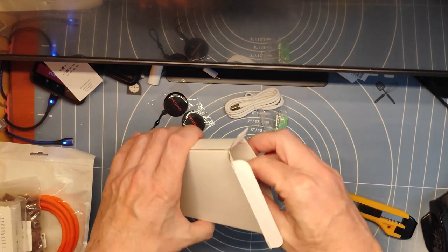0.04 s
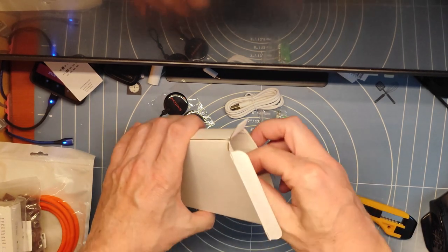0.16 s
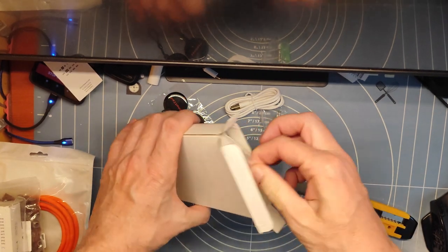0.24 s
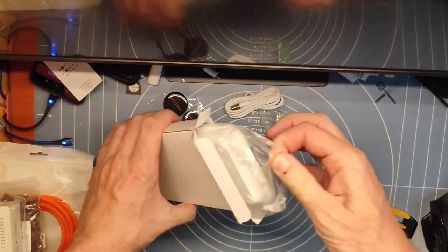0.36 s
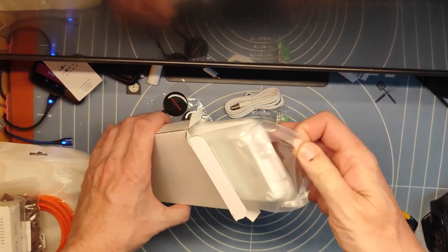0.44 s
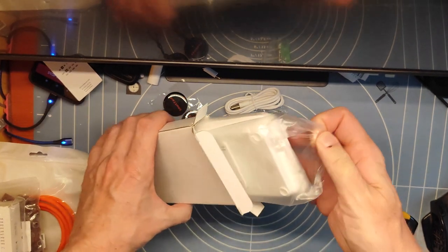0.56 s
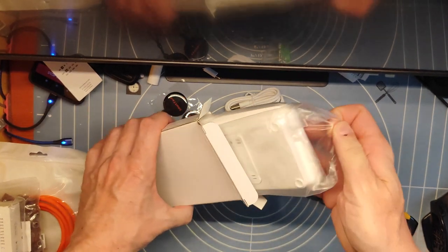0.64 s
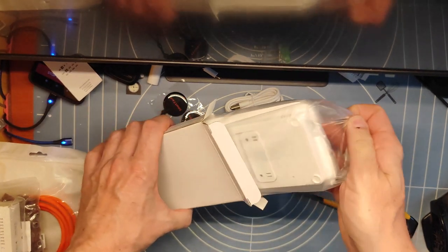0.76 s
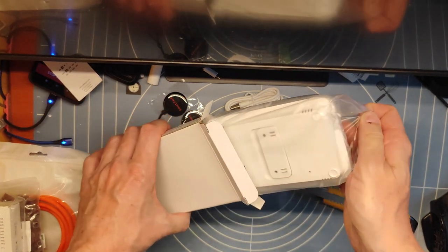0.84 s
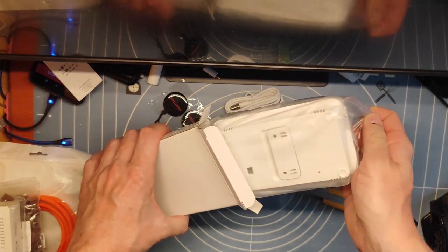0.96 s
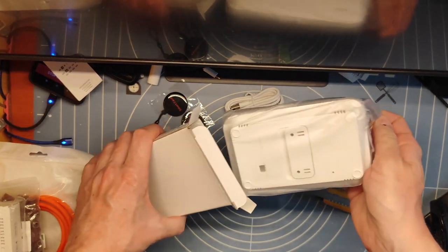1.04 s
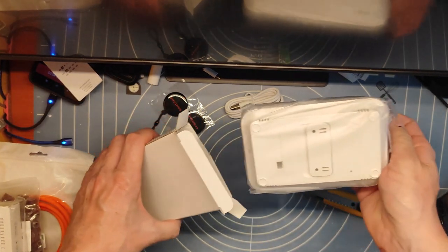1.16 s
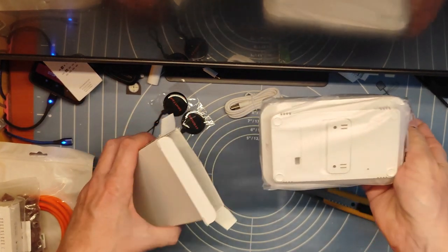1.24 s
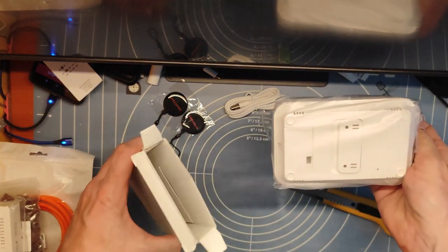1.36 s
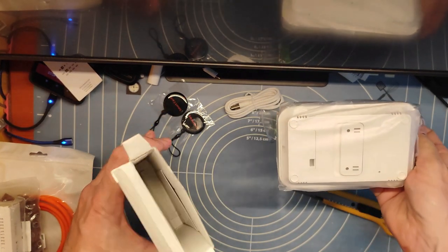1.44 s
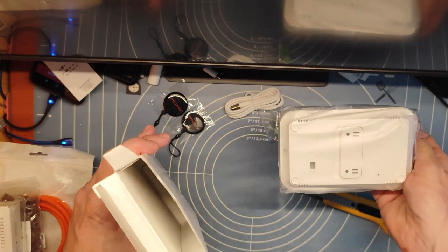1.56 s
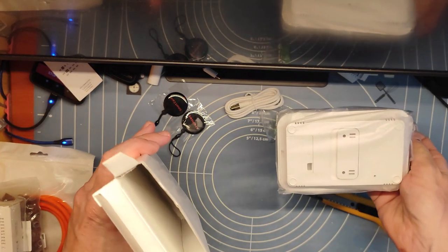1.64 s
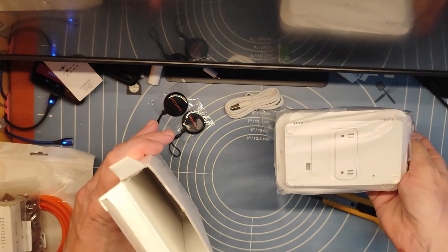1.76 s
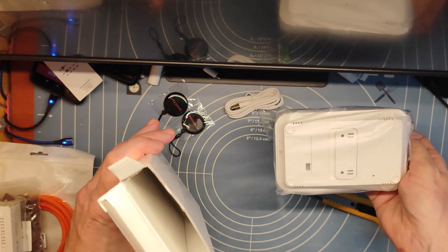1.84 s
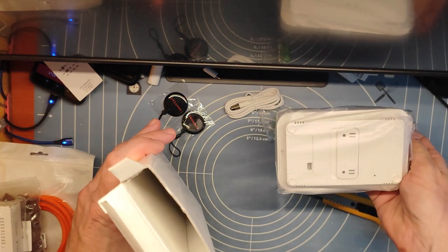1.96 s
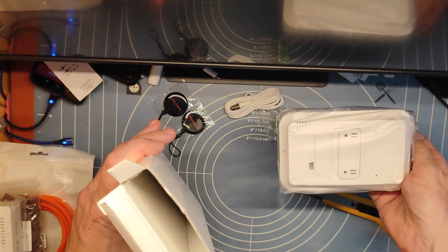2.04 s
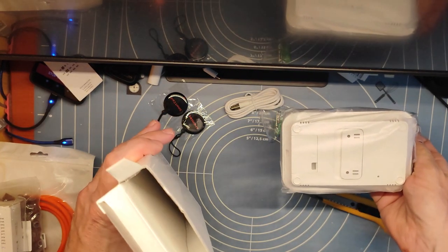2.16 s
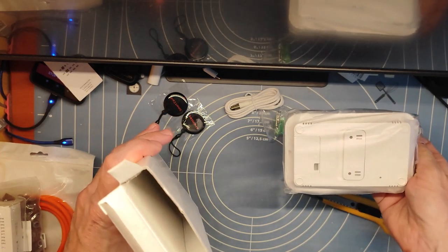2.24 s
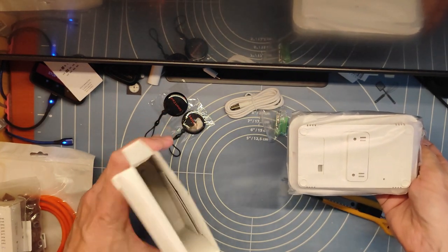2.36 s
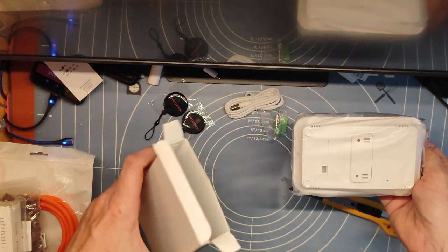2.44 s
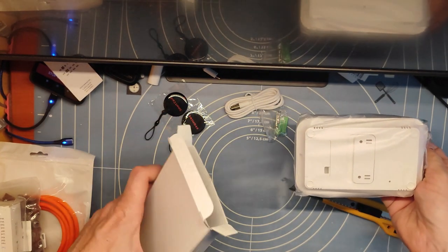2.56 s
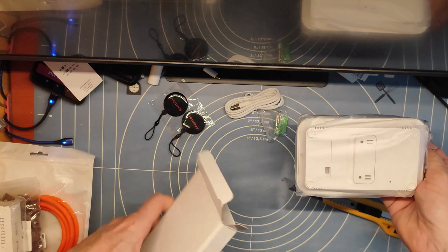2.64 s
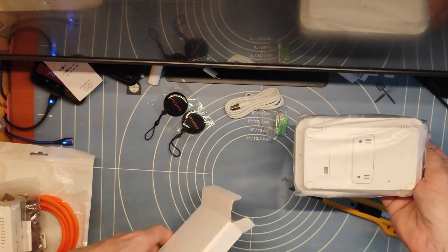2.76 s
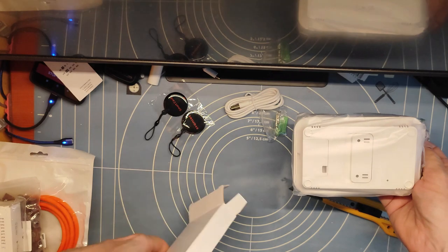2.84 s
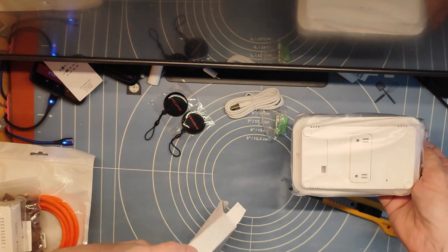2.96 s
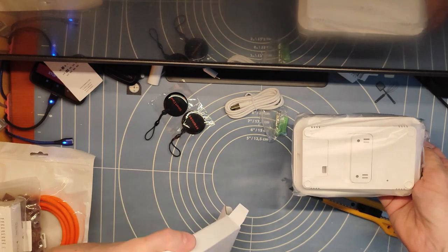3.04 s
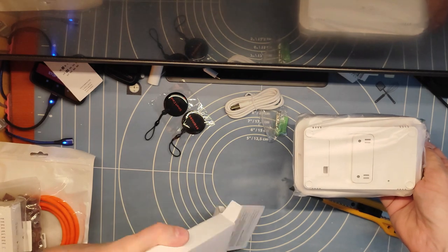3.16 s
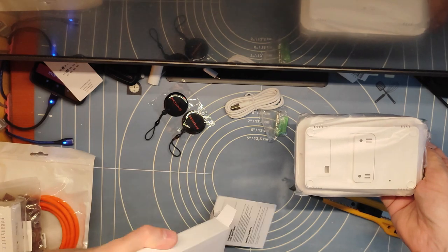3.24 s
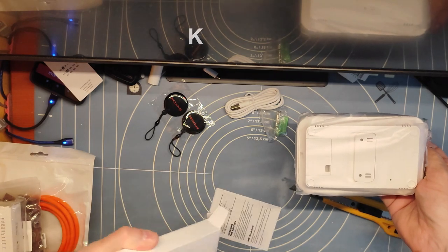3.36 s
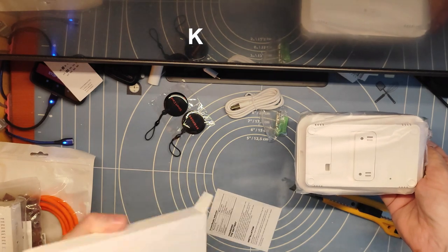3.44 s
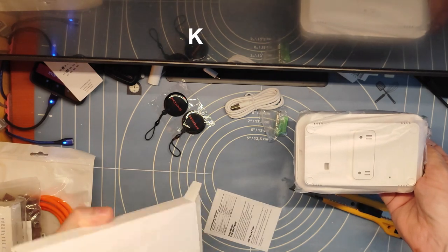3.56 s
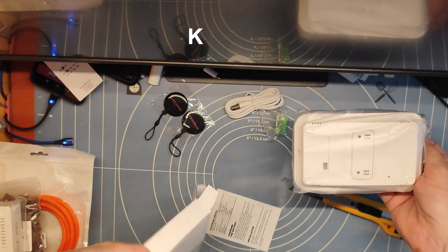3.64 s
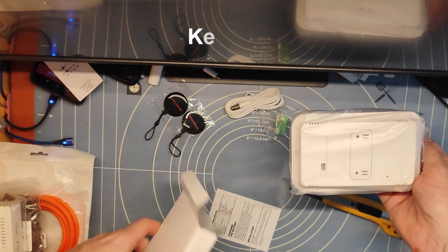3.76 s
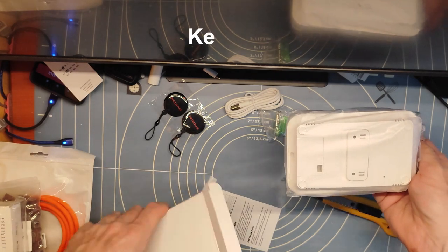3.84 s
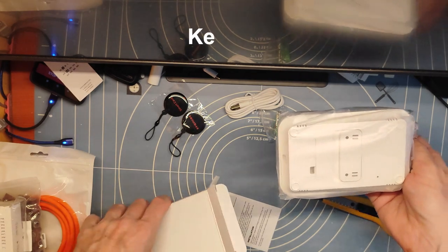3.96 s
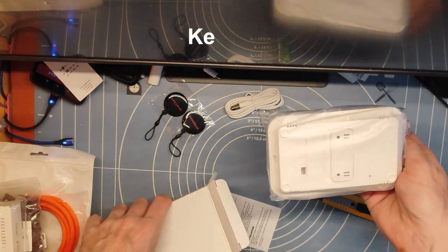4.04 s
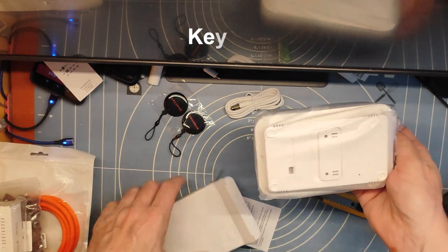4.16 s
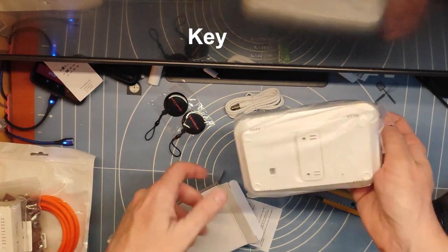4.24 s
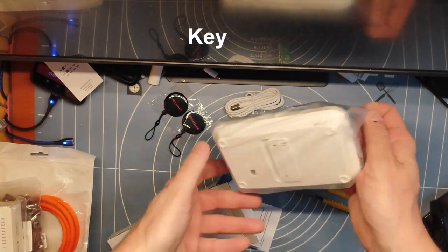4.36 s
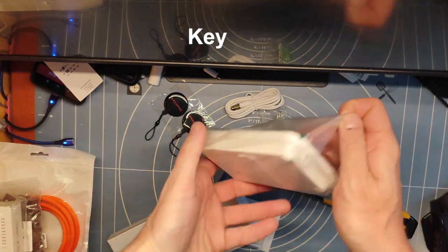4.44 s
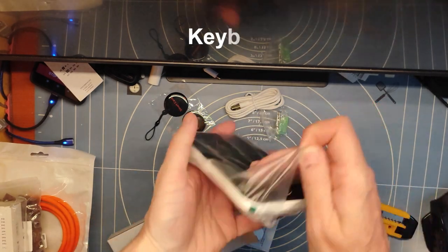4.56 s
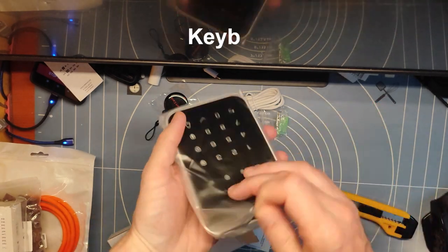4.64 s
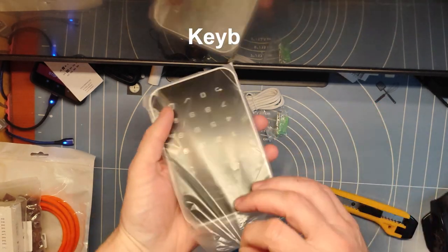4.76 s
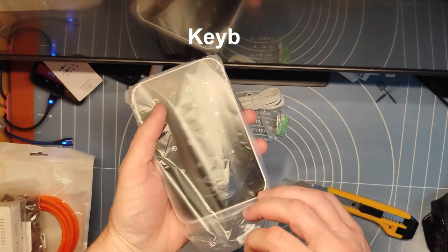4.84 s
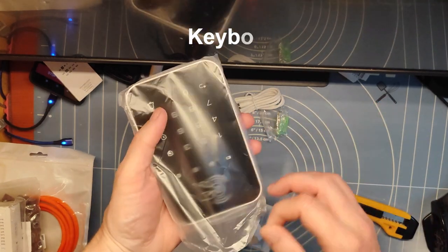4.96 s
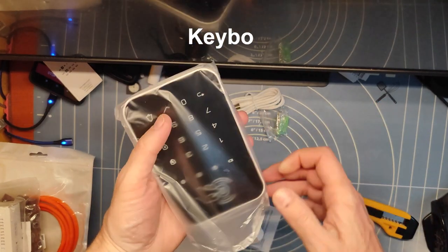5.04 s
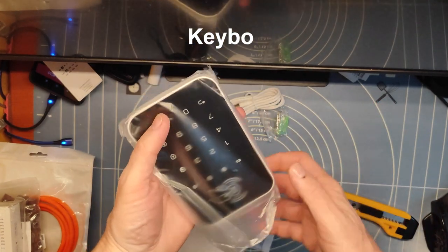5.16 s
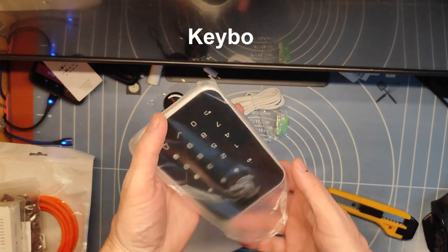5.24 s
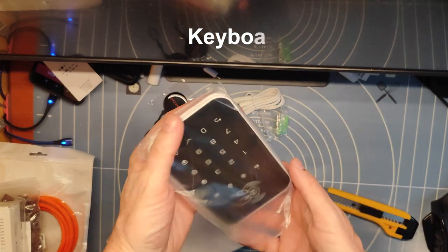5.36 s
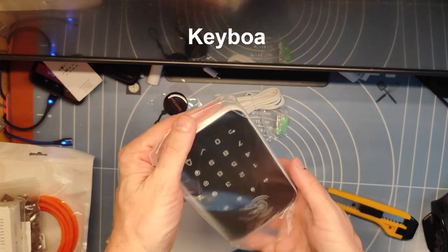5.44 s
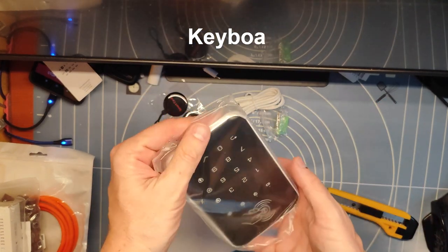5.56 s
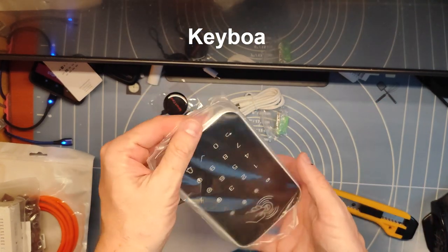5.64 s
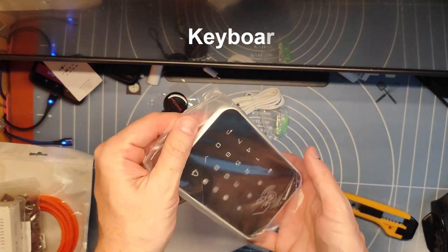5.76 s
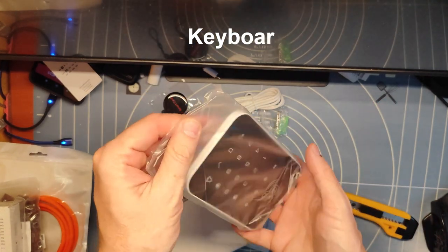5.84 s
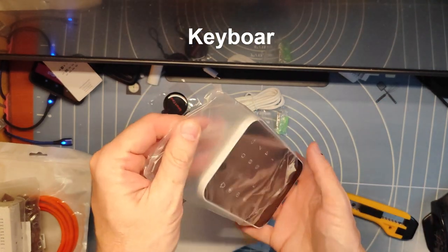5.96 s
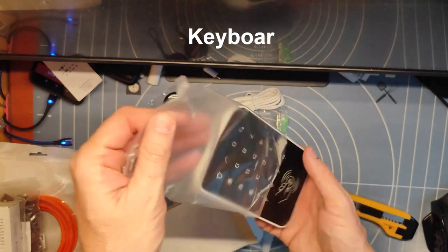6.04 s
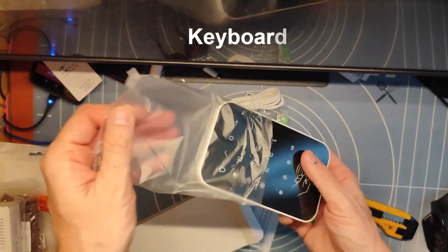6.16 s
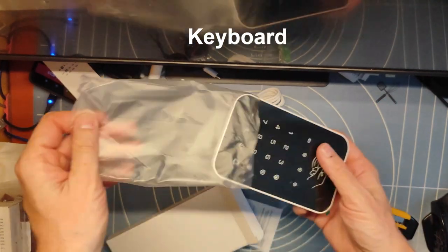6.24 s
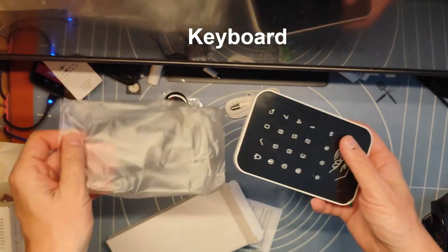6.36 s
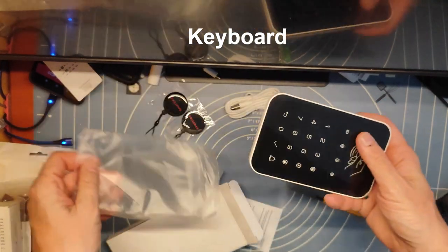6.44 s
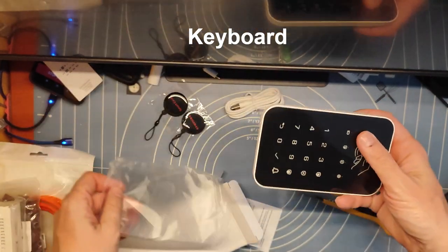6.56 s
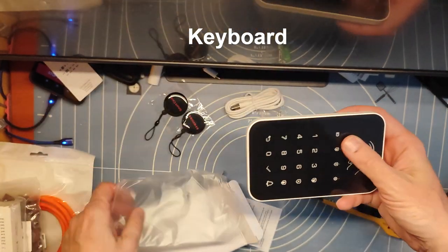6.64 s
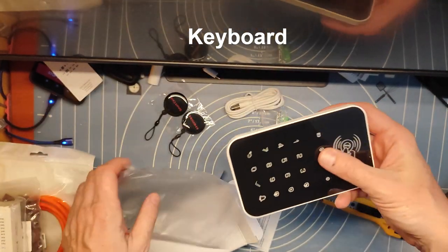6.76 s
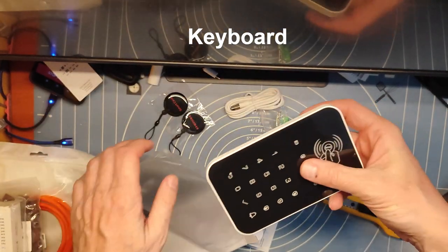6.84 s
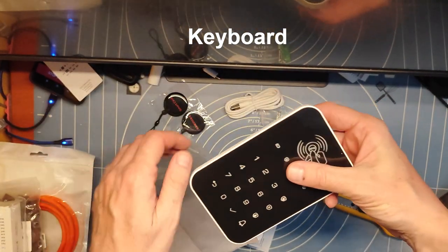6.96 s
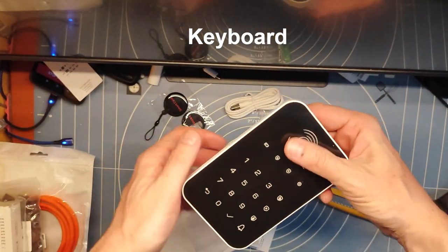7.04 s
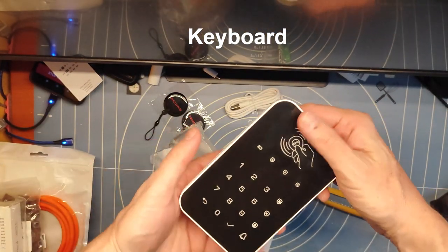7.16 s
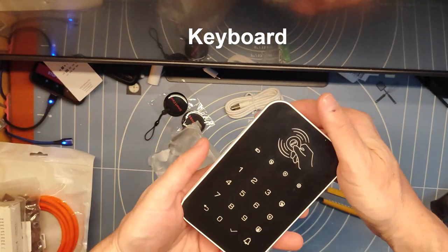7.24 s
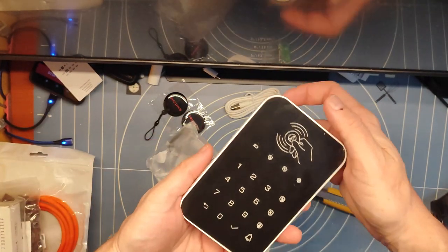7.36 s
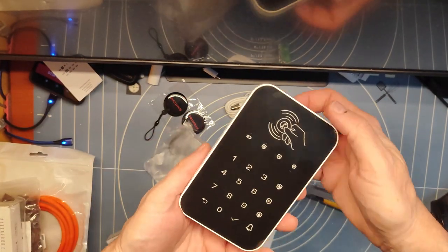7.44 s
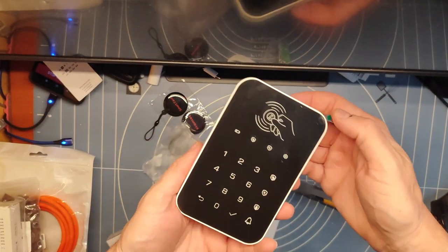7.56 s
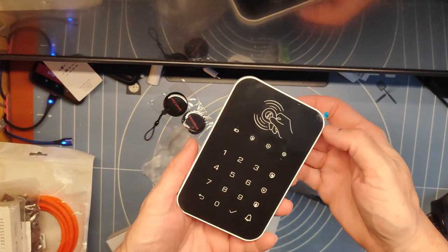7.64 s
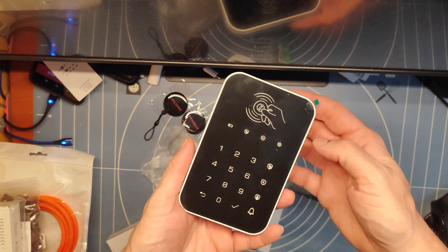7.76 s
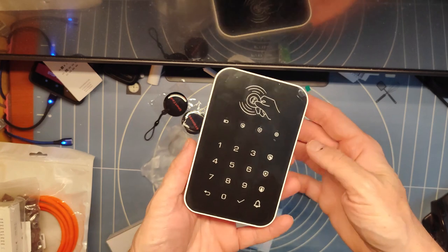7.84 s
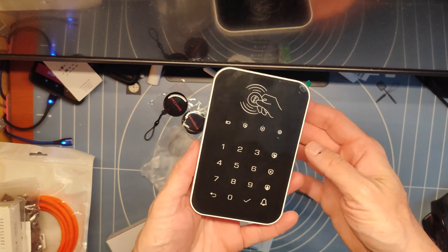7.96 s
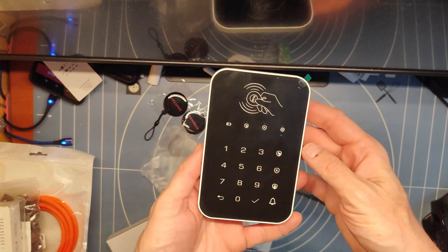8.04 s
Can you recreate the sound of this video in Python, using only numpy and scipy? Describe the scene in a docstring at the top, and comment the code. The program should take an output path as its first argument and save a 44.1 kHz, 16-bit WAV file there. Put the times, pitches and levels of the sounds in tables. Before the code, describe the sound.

Bright plastic crinkling in bursts with light card knocks, then a calmer stretch of soft cardboard rubbing and one sharp paper slap. A double hollow clatter of a dropped box follows, then dense film crackling and a long rustling slide as the bag comes off, ending in faint handling taps. Close, dry indoor sound with short reflections and faint fan noise.

```python
"""A keypad in a thin plastic bag is slid out of a small cardboard box, close to the microphone in a quiet room.
The box is shaken until a leaflet slaps onto the desk, then drops and bounces; the bag is pulled off and put down.
The film is dense random clicks and tiny rings shaped by hand effort, with sharp noise ticks for single creases.
Card is rubbed crackle and pitched flicks, knocks are panel-like modes, paper is clicks with fold resonances.
Short reflections surround the handling, over steady fan noise and wavering hum lines."""
import sys
import numpy as np
from scipy import signal
from scipy.fft import rfft, irfft, next_fast_len
from scipy.io import wavfile
from scipy.ndimage import uniform_filter1d

SR = 44100
rng = np.random.default_rng(int(sys.argv[2]) if len(sys.argv) > 2 else 0)


def persist_wave(psi):
    """Save psi, clipped to +-1, as 16-bit WAV."""
    counts = np.round(np.clip(psi, -1, 1) * 32767).astype(np.int16)
    wavfile.write(sys.argv[1], SR, np.atleast_2d(counts).T)


N = 357210
T = np.arange(N) / SR

# Room noise outline: f/Hz, level/dB
ROOM_TONE = [(20, -15.5), (50, -3), (80, -6.5), (140, 3), (190, -3.5), (250, -3.5), (420, -8), (700, -12.5),
             (1200, -20), (2500, -25), (5000, -31), (8000, -38), (14500, -37.5)]
# Steady equipment lines: f/Hz, level/dB, wander/Hz
HUM_LINES = [(118.6, -60.5, 0.1), (148.7, -65.5, 1.515), (240.8, -74.5, 3)]
# The microphone's port cancels near 8 kHz and rings just above: f/Hz, level/dB
MIC_COLOUR = [(5000, 0), (6900, 1), (7400, -5), (7950, -5.5), (8400, -1), (8800, 8), (9200, 12.5),
              (10600, 6), (11900, 9), (13000, 3.5), (14200, 3.5)]
# Low hollow rings of box, leaflet slap and desk, before a 1 dB lift:
# t/s, f/Hz, peak level/dB, swell/s, t60/s
LOW_HOLLOWS = [(1.11, 160, -53.5, 0.1, 0.63), (3.218, 133, -33.5, 0.00225, 0.039),
               (4.219, 232.5, -28.5, .003, 0.037), (4.254, 149, -38, 0.0023, 0.25)]
# Card flaps, fingertips and taut film flicking: t/s, centre f/Hz, peak level/dB
STIFF_FLICKS = [(.8, 1877, -34), (1.002, 1440, -39.5), (1.022, 2270, -41), (1.101, 1674, -41),
                (1.177, 1598, -45.5), (1.24, 1970, -38.5), (4.283, 2247, -36.5), (4.31, 1400, -33.5),
                (4.397, 1065, -38.5), (4.404, 1900, -36.5), (4.419, 920, -37), (5.176, 1748, -41),
                (5.376, 1087, -37), (5.767, 1070, -43), (5.926, 1010, -35.5), (6.574, 5000, -44),
                (6.66, 1480, -35), (7.8, 1029, -44.5), (7.804, 2576, -51.5)]
# Fingers squeaking on the card: peak t/s, level/dB
FINGER_SQUEAKS = [(3.497, -59.5), (3.583, -53), (3.662, -62), (3.752, -60)]
# Leaflet paper outline: f/Hz, level/dB
PAPER_COLOUR = [(150, -13), (500, -7), (800, -18), (1500, 7), (2000, -7), (2600, -6), (3100, -3.5),
                (3700, 2.5), (5700, 1.5), (7000, 0), (9300, -1), (10500, -3.5), (14000, -6)]
# Strokes of card and fingers as the box is lifted and shaken and the keypad turned:
# peak t/s, body level/dB, treble relative level/dB, rise/s, fall/s (levels before the card's offsets)
CARD_RUBS = [(1.30, -65, -6, 0.0215, 0.19), (1.62, -61.5, -10, .012, 0.0136),
             (2.432, -58.5, -3.5, 0.012, .02), (2.657, -55.5, -3.5, 0.026, 0.0606),
             (2.955, -57, 0, 0.033, 0.045), (3.09, -57, -3.5, 0.068, 0.069), (3.17, -63.5, 11, 0.025, .035),
             (3.235, -49.5, -9, .008, 0.049), (3.58, -69, -13.5, 0.0335, .03),
             (3.682, -58.5, 1.5, 0.0285, 0.033), (3.775, -57, -1, 0.022, 0.036),
             (7.45, -68.5, -5, 0.48, 0.45)]
# Rubbed card outline: f/Hz, level/dB
CARD_COLOUR = [(100, -20), (400, 1.5), (580, -4.5), (700, -2), (790, -0.5), (880, 1), (1020, -7),
               (1700, -5.5), (3000, -13), (6000, -17.5), (14000, -19.5)]
# Knocks of box, leaflet slap and fingers: t/s, panel peak level/dB, thump relative level/dB,
# crack relative level/dB, chatter t60/s, struck spot along the panel (0-1)
HANDLING_KNOCKS = [(.711, -31, -17, -30, .03, 0.35), (.729, -32, -11, -24, .051, .3),
                   (.767, -37, -9, -12, 0.076, .3), (1.24, -44.5, -14, -1.5, .045, .3),
                   (1.289, -44.5, -5, -5, .049, .3), (1.345, -50, -5, -5, .05, .3),
                   (1.576, -52.5, 2.5, -19, .031, .3), (2.404, -48.5, -10, -12, 0.09, 0.36),
                   (2.659, -32.5, -25, -16, 0.072, .3), (2.707, -40, -1.5, -7.5, 0.08, 0.26),
                   (3.219, -28.5, -13, 0, .071, .5), (3.563, -47, -4.5, -12, 0.073, .35),
                   (3.576, -48.5, 2, -16, .1, .35), (4.191, -27, -5, -15, .047, .5),
                   (4.216, -19, -4, -6.5, .021, .25), (4.224, -22.5, -1, -27, .035, 0.22),
                   (4.255, -16.5, -7.5, -5.5, 0.037, .52), (4.309, -34.5, 1, -5, 0.043, .5),
                   (6.035, -40, 1, 1, 0.23, .3), (7.135, -45.5, -28.5, -2, .079, .4),
                   (7.597, -48.5, -8, -0.5, 0.044, .4)]
# Modes of the box on the desk, shared by all knocks: f/Hz, level/dB, t60/s before a cap
PANEL_MODES = [(162, -2, 0.056), (231, -11, 0.088), (335.6, -2, 0.087), (522, -5, 0.076), (685, 0.5, 0.044),
               (755, 5.5, 0.025), (871, 7, 0.018), (1042, -4, 0.034), (1198, -3.5, .05), (1280, -11, 0.015),
               (1450, -5, 0.022)]
# Crack of a card edge, outline: f/Hz, level/dB
EDGE_CRACK = [(900, -19), (1700, -19.5), (2250, -1), (2600, 0.5), (3150, -1.5), (4000, -9.5), (14000, -20)]
# Loud creases and lone faint ticks of film, plus fingertip ticks on the keypad at 6.985 s and 7.597 s: t/s,
# reference level/dB, body relative level/dB
FILM_CREASES = [(.0167, -33, -20), (.0737, -43, 0), (.35, -32, -6), (0.5363, -36, -2.5),
                (.7778, -26.5, -7.5), (.802, -32.5, 0), (0.9201, -30, -5.5), (1.0682, -32, -8),
                (1.105, -20, -16), (1.204, -34.5, -7), (1.2397, -35.5, -7.5), (1.4741, -47.5, -5.5),
                (1.6193, -46.5, -3.5), (1.804, -34.5, -7), (2.109, -40, -7), (2.1973, -46.5, -3),
                (2.6606, -38, -2.5), (4.348, -34, -9), (4.395, -21.5, -31), (4.582, -30, -22),
                (4.6059, -29, -3), (4.696, -26.5, -8.5), (4.7271, -24.5, -7), (4.8552, -20.5, -7),
                (4.9485, -27, -2), (4.9885, -32, -16), (5.0652, -33, -5), (5.4672, -23, -7),
                (5.5196, -23, -4.5), (5.5792, -25.5, -6.5), (5.6659, -26.5, -7.5), (5.7518, -27, -19),
                (5.761, -24.5, -9), (6.0527, -18.5, -10), (6.115, -23.5, -20), (6.4655, -35, -20.5),
                (6.575, -42, -7.5), (6.6095, -35, -5), (6.665, -31, 1), (6.7117, -26, -4),
                (6.7697, -36, -15.5), (6.985, -54.5, 7), (7.1379, -36, 2.5), (7.597, -48, -8)]
# Plastic film outline: f/Hz, level/dB
FILM_COLOUR = [(50, -9), (110, 2), (300, 5.5), (600, 3), (900, 4.5), (1400, -1), (1900, 2), (3600, -5.5),
               (4200, -1.5), (5000, -7), (7000, -1), (14000, -8.5)]
# Separate tugs and squeezes of the bag:
# peak t/s, body level/dB, treble relative level/dB, rise/s, fall/s (levels before the film's offsets)
BAG_TUGS = [(.598, -46.5, 4.5, 0.027, 0.034), (.657, -50, 3, 0.039, 0.047), (.845, -45.5, 2.5, 0.046, .035),
            (.93, -48.5, 2.5, 0.0094, 0.031), (1.02, -49.5, 2, 0.035, .04), (1.108, -49, 0, 0.0138, 0.0284),
            (1.243, -55, 0, 0.0095, 0.011), (4.395, -48.5, 5.5, 0.0197, 0.017), (4.54, -51, 3, 0.07, .04),
            (4.615, -45, 2.5, 0.037, .065), (4.772, -40, 3, 0.049, 0.058), (4.94, -47, 4, 0.074, 0.03),
            (5.122, -54, 4.5, 0.14, 0.19), (5.335, -48.5, 2, 0.079, 0.061), (5.51, -42, 4.5, 0.08, 0.073),
            (5.588, -50, 2.5, 0.034, 0.12), (6.62, -49.5, 1.5, 0.019, .025),
            (6.66, -46.5, 3, 0.0222, 0.0288), (6.715, -51, 1, 0.0184, 0.0336), (6.81, -56, 0, 0.09, .06),
            (6.93, -60.5, -1, 0.016, 0.0334), (7.098, -56.5, 2.5, 0.02, 0.03),
            (7.14, -58.5, -3, 0.013, 0.036)]
# Long slide of the bag out of the box: t/s, body level/dB, treble relative level/dB (before the offsets)
BOX_SLIDE = [(0.0, -60.5, -2.5), (0.014, -61, 4), (0.066, -56.5, -2), (0.164, -62, 0.5), (0.27, -46.5, 3),
             (0.308, -52, 1), (0.336, -43, 0.5), (0.402, -47, 4.5), (0.56, -59, 0)]
# Long slide of the bag off the keypad: t/s, body level/dB, treble relative level/dB (before the offsets)
KEYPAD_SLIDE = [(5.71, -54, 2), (5.758, -57.5, 11.5), (5.782, -47.5, 2.5), (5.81, -52.5, 6.5),
                (5.86, -45.5, 2.5), (6.0, -51.5, 3), (6.048, -45.5, 4), (6.486, -55.5, 2), (6.56, -71, -2)]

TREBLE_HZ, TOP_HZ = 8000, 14250  # body/treble split and top cut
STROKE_ROUNDNESS = 1.08  # 1 gives a pointed swell, 2 a bell
CREASE_T60_S, FLICK_T60_S = 0.011, 0.036
SQUEAK_HZ, SQUEAK_LENGTH_S = 864, 0.015
# small film creases that snap at random
SNAPS_PER_S, SNAP_SPREAD_DB, SNAP_DB = 45, 2, -4
# the film catches and lets go in jerks, most of all in the treble
JERKS_PER_S, JERK_BODY_DB, JERK_TREBLE_DB = 70, 1.02, 2
# the leaflet strikes edge first, flops flat, then glides; levels drive the clicks before colouring
LAND_S = 3.2187
EDGE_DB, EDGE_RISE_S, EDGE_FALL_S = -22, .0022, .0028
FLOP_DB, FLOP_AFTER_S, FLOP_LENGTH_S = -44.5, 0.013, 0.0069
GLIDE_DB, GLIDE_AFTER_S, GLIDE_LENGTH_S = -60.5, 0.088, .05


def undb(db):
    """Decibels to gain."""
    return 10 ** (np.asarray(db) / 20)


def unit(x):
    """Scale to rms 1."""
    return x / np.sqrt(np.mean(x ** 2))


def peak(x, db):
    """Scale to a peak level."""
    return x * undb(db) / np.abs(x).max()


def band(x, lo_hz, hi_hz):
    """Band-pass."""
    edges = [lo_hz, min(hi_hz, SR / 2 - 1)]
    return signal.sosfilt(signal.butter(3, edges, "band", fs=SR, output="sos"), x)


def colour(x, points, size=4096):
    """Causal, minimum-phase filter with a (f/Hz, level/dB) outline."""
    hz, db = np.transpose(points)
    f = np.maximum(np.arange(size // 2 + 1) * SR / size, 1)
    outline = undb(np.interp(np.log(f), np.log(hz), db))
    # folding the cepstrum forward in time gives minimum phase
    cepstrum = irfft(np.log(outline))
    cepstrum[1:size // 2] *= 2
    cepstrum[size // 2 + 1:] = 0
    response = irfft(np.exp(rfft(cepstrum)))
    return signal.fftconvolve(x, response)[:len(x)]


def walk(rate):
    """Smoothed random steps with a spread near 1, drawn at a rate per second."""
    k = int(SR / rate)
    steps = np.repeat(rng.standard_normal(N // k + 1), k)
    return unit(uniform_filter1d(steps, k)[:N])


def fade(t, t60):
    """Exponential decay, its t60 never below 2 ms."""
    return undb(-60 * t / max(t60, .002))


def add(out, s, x):
    """Mix x in at time s."""
    i = max(int(s * SR), 0)
    out[i:i + len(x)] += x[:N - i]


def swell(s, rise_s, fall_s):
    """Effort builds up to a peak at time s and lets go."""
    away = np.maximum((s - T) / rise_s, (T - s) / fall_s)
    near, out = away < 8, np.zeros(N)
    out[near] = np.exp(-away[near] ** STROKE_ROUNDNESS)
    return out


def controls(strokes, slides):
    """Body and treble gains of the hands' work: short strokes and long slides add in power."""
    power = np.zeros((2, N))
    for s, db, treble_db, rise_s, fall_s in strokes:
        power += (undb([[db], [db + treble_db]]) * swell(s, rise_s, fall_s)) ** 2
    for slide in slides:
        s, db, treble_db = np.transpose(slide)
        inside = (T >= s[0]) & (T <= s[-1])
        gate = uniform_filter1d(1. * inside, size=600)
        levels = [np.interp(T, s, db), np.interp(T, s, db + treble_db)]
        power += (gate * undb(levels)) ** 2
    return np.sqrt(power)


def clicks(rate, spread_db):
    """Random impulses of either sign and uneven size."""
    size = undb(spread_db * np.clip(rng.standard_normal(N), -2, 2))
    sign = np.sign(rng.standard_normal(N))
    return unit((rng.random(N) < rate / SR) * size * sign)


def crackle(rate, spread_db, ring_s):
    """Clicks that each start a brief, dying burst of noise."""
    hits = clicks(rate, spread_db) ** 2 + 1e-12
    energy = signal.lfilter([1], [1, -np.exp(-2 / (ring_s * SR))], hits)
    return unit(np.sqrt(energy) * rng.standard_normal(N))


def flutter(x, depth_db, rate, count=16):
    """Facets change size as a sheet bends: neighbouring bands swell and sink on their own."""
    size = next_fast_len(N)
    spectrum = rfft(x, size)
    hz = np.arange(len(spectrum)) * SR / size
    place = np.interp(np.log(hz + 600), np.log([800, 15000]), [0, count - 1])
    out = np.zeros(N)
    for k in range(count):
        overlap = np.maximum(1 - np.abs(place - k), 0)
        out += irfft(spectrum * overlap, size)[:N] * undb(depth_db * walk(rate))
    return out


def facets(rate, spread_db, cycles):
    """Each buckle rings one small facet of film for a few cycles at its own pitch."""
    out, t = np.zeros(N + SR // 100), np.arange(SR // 100) / SR
    events = int(rate * N / SR)
    when, pitch, size = rng.random((events, 3)).T
    hz = 600 * (14000 / 600) ** (pitch ** .6)  # favours the high pitches
    gain = undb(-spread_db * np.log(np.maximum(size, .04))) * hz ** .7
    hz, gain = hz[:, None], gain[:, None]
    rings = gain * np.sin(2 * np.pi * hz * t) * undb(-60 * t * (hz + 1000) / cycles)
    np.add.at(out, (when * N).astype(int)[:, None] + np.arange(len(t)), rings)
    return unit(out[:N])


def played(source, effort, ref_lo_hz, ref_hi_hz, body_db, treble_db):
    """A texture follows the hand's effort; body and treble each follow their own level."""
    body, treble = effort
    low = signal.sosfilt(signal.butter(6, TREBLE_HZ, "low", fs=SR, output="sos"), source)
    high = signal.sosfilt(signal.butter(6, TREBLE_HZ, "high", fs=SR, output="sos"), source)
    low = low / np.std(band(source, ref_lo_hz, ref_hi_hz))
    high = high / np.std(band(source, TREBLE_HZ, TOP_HZ))
    return low * body * undb(body_db) + high * treble * undb(treble_db)


def background():
    """Fan noise is shaped random air; each hum line is a sine whose pitch wanders."""
    air = unit(colour(rng.standard_normal(N), ROOM_TONE)) * undb(-62.5 + 0.21 * walk(6.3))
    lines = np.zeros(N)
    for hz, db, wander_hz in HUM_LINES:
        phase = 2 * np.pi * np.cumsum(hz + wander_hz * walk(6)) / SR
        lines += undb(db) * np.sqrt(2) * np.sin(phase)
    return air + lines


def room(x, wet_db, t60):
    """Dense, short reflections from the desk, screen and walls: a decaying noise tail."""
    t = np.arange(SR // 2) / SR
    onset = 1 - fade(t, 0.0027)
    tail = band(rng.standard_normal(len(t)), 160, 13000) * fade(t, t60) * onset
    return x + undb(wet_db) * signal.fftconvolve(x, tail / np.linalg.norm(tail))[:N]


def hollows():
    """A low ring swells and dies away on one rough, slightly unsteady pitch."""
    out, t = np.zeros(N), np.arange(SR // 2) / SR
    for s, hz, db, swell_s, t60 in LOW_HOLLOWS:
        phase = 2 * np.pi * np.cumsum(hz * (1 + .025 * walk(400)[:len(t)])) / SR
        rough = undb(3 * walk(hz / 7)[:len(t)])
        shape = (1 - np.exp(-t / max(swell_s, .001))) ** 2 * fade(t, t60)
        add(out, s, peak(np.sin(phase) * rough * shape, db + 1))
    return out


def squeaks():
    """Skin sticks and slips on the card and briefly sounds one panel at a rough pitch."""
    effort = sum(undb(db) * swell(s, SQUEAK_LENGTH_S, SQUEAK_LENGTH_S) for s, db in FINGER_SQUEAKS)
    phase = 2 * np.pi * np.cumsum(SQUEAK_HZ * (1 + .03 * walk(400))) / SR
    return effort * unit(np.sin(phase) * undb(3 * walk(120)))


def flicks():
    """A small stiff patch rings at one pitch inside a brief spray of chatter."""
    out, t = np.zeros(N), np.arange(SR // 8) / SR
    for s, hz, db in STIFF_FLICKS:
        spray = unit(band(rng.standard_normal(len(t)), hz * 0.33, hz * 1.784)) * fade(t, 0.029)
        ring = np.sin(2 * np.pi * hz * t) * fade(t, FLICK_T60_S)
        add(out, s, peak(ring + undb(-4.5) * spray, db))
    return out


def rubbing():
    """Card fibres catch and slip, sounding the hollow of the box."""
    slips = flutter(crackle(rate=1400, spread_db=2.5, ring_s=0.003), depth_db=1.5, rate=15)
    slips = slips * undb(2.6 * walk(45))
    effort = controls(CARD_RUBS, [])
    return played(colour(slips, CARD_COLOUR), effort, 520, 2500, body_db=-1.5, treble_db=-7)


def leaflet():
    """Folded paper slaps the mat in a tight burst of ticks, flops and glides; its folds colour the crack."""
    edge = undb(EDGE_DB) * swell(LAND_S, EDGE_RISE_S, EDGE_FALL_S)
    flop = undb(FLOP_DB) * swell(LAND_S + FLOP_AFTER_S, FLOP_LENGTH_S, FLOP_LENGTH_S)
    glide_gain = undb(GLIDE_DB + 2.5 * walk(100))
    glide = glide_gain * swell(LAND_S + GLIDE_AFTER_S, GLIDE_LENGTH_S, GLIDE_LENGTH_S)
    burst = clicks(rate=30000, spread_db=-0.5) * (edge + flop + glide)
    folds = np.zeros(N)
    for hz in (3560, 4500, 5280, 5770):
        folds += signal.lfilter(*signal.iirpeak(hz, hz / 200, fs=SR), burst)  # 200 Hz wide
    # the stiff edge strikes with one sharp spike
    add(burst, LAND_S, undb(-8.5) * np.ones(1))
    return band(colour(burst + folds, PAPER_COLOUR), 220, 19500)


def knocks():
    """Each knock has a low thump, panel-like modes and chatter, with a crack on top."""
    out, t = np.zeros(N), np.arange(SR // 4) / SR
    mode_hz, mode_db, mode_t60 = np.transpose(PANEL_MODES)
    number, deep = np.arange(len(mode_hz)) + 1, mode_hz < 450
    # no mode has a t60 above 0.07 s
    modes = np.array([np.sin(2 * np.pi * f * t) * fade(t, min(d, .07)) for f, d in zip(mode_hz, mode_t60)])
    rise = 1 - fade(t, 0.012)
    for s, db, thump_db, crack_db, t60, spot in HANDLING_KNOCKS:
        chatter = rng.standard_normal(len(t)) * fade(t, t60)
        # a mode struck near its node sounds weaker
        reach = 0.39 + np.abs(np.sin(np.pi * number * spot))
        weight = (-1.) ** number * undb(mode_db) * reach
        thump = weight[deep] @ modes[deep] + undb(8) * band(chatter, 130, 450)
        panels = weight[~deep] @ modes[~deep] + undb(11) * band(chatter, 620, 1800)
        thump = peak(band(thump * rise, 70, 3000), db + thump_db)
        add(out, s - .0008, thump + peak(panels * rise, db))
        add(out, s, peak(colour(chatter * fade(t, 0.1), EDGE_CRACK), db + crack_db))
    return out


def creases():
    """Film snaps over with a sharp tick of noise, loud or faint, and the sheet flutters briefly."""
    out, t = np.zeros(N), np.arange(SR // 20) / SR
    for s, db, body_db in FILM_CREASES:
        decay = fade(t, CREASE_T60_S) + undb(-20) * fade(t, .03)
        snap = rng.standard_normal(len(t)) * decay
        # the treble tick peaks 5 dB below the reference level
        add(out, s, peak(band(snap, TREBLE_HZ, 16200), db - 5))
        add(out, s, peak(band(colour(snap, FILM_COLOUR), 780, 9360), db + body_db))
    return flutter(out, depth_db=2, rate=30)


def bag():
    """Film buckles in flurries of clicks and ringing facets over the fine scrape of film on plastic."""
    buckles = undb(-3.5) * crackle(rate=450, spread_db=1.5, ring_s=0.0019)
    rings = facets(rate=1200, spread_db=2.5, cycles=28.6)
    scrape = undb(-0.5) * clicks(rate=12000, spread_db=1.0)
    snaps = undb(SNAP_DB) * crackle(SNAPS_PER_S, SNAP_SPREAD_DB, ring_s=.0022)
    film = colour(flutter(buckles + rings + scrape + snaps, depth_db=2, rate=22), FILM_COLOUR)
    jerks = undb(np.outer([JERK_BODY_DB, JERK_TREBLE_DB], np.clip(walk(JERKS_PER_S), -2, 2)))
    effort = controls(BAG_TUGS, [BOX_SLIDE, KEYPAD_SLIDE]) * jerks
    return played(film, effort, 1207, 5950, body_db=0.0, treble_db=-5)


def scene():
    """All handling sounds in the room, over the hum."""
    box_and_paper = hollows() + squeaks() + flicks() + rubbing() + leaflet() + knocks()
    handling = box_and_paper + creases() + bag()
    return (room(handling, wet_db=-11.5, t60=0.3) + background())[None]


def record(dry):
    """The microphone's colour, then a steep low-pass cuts the top."""
    top_cut = signal.ellip(10, .2, 70, TOP_HZ, fs=SR, output="sos")
    return signal.sosfilt(top_cut, colour(dry[0], MIC_COLOUR))[None]


dry = scene()
out = record(dry)
persist_wave(out)
```